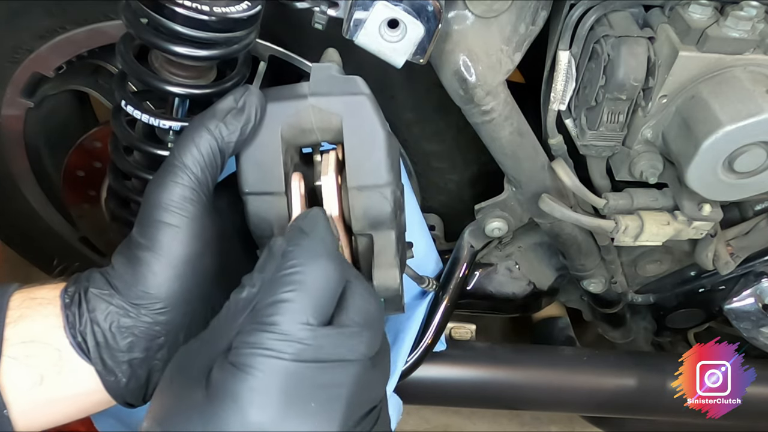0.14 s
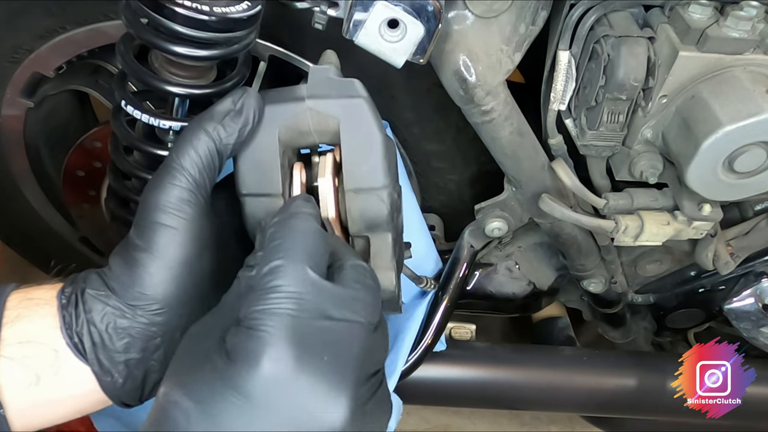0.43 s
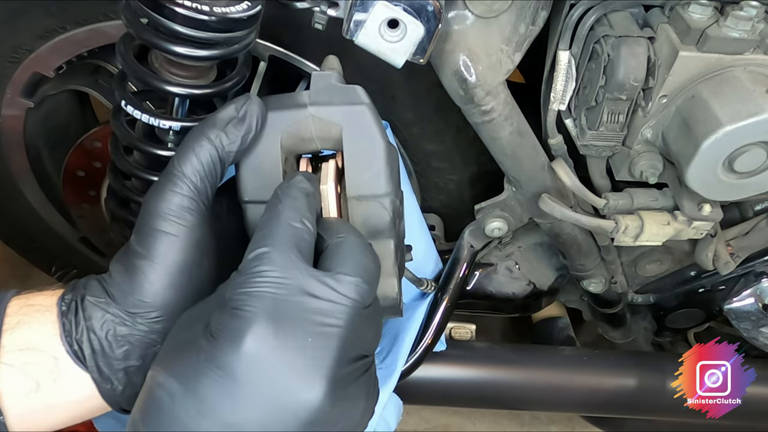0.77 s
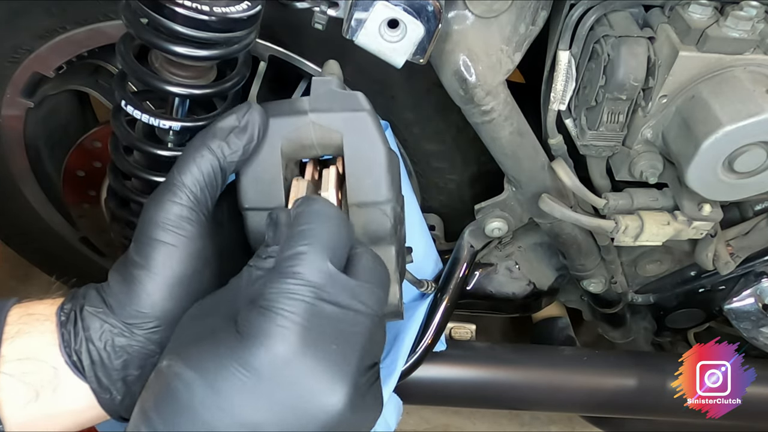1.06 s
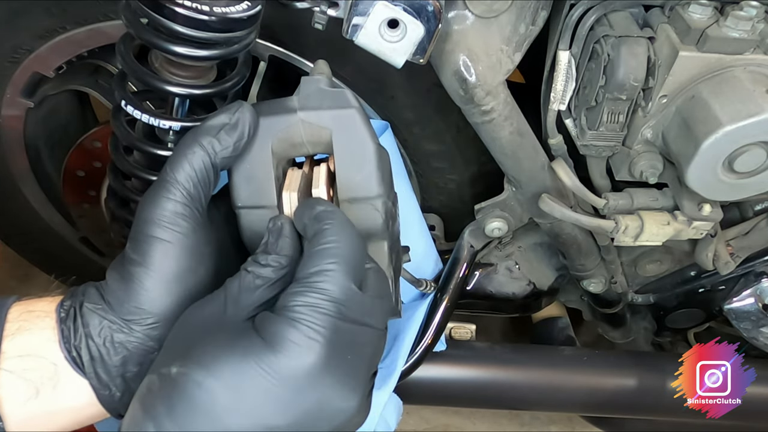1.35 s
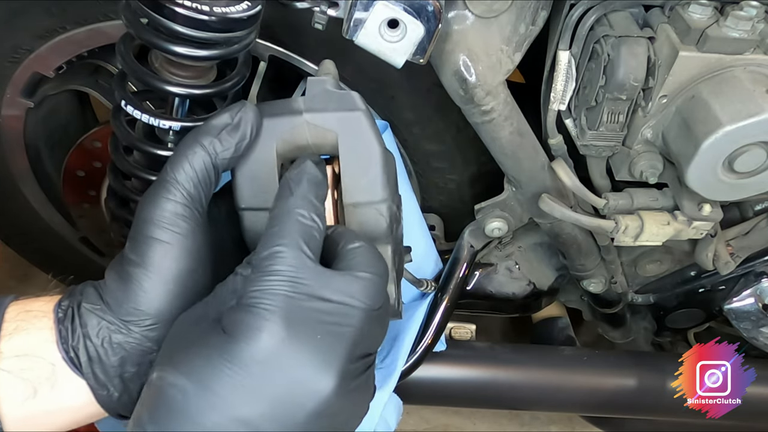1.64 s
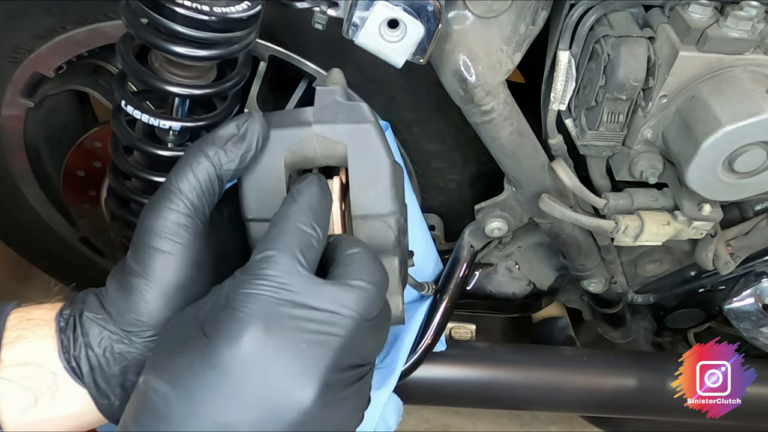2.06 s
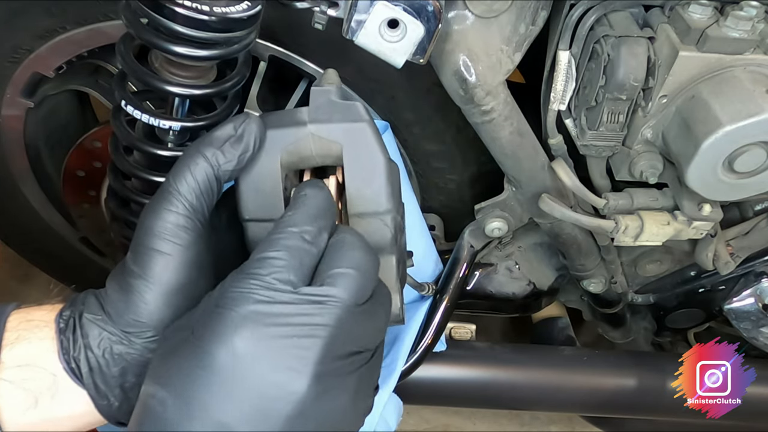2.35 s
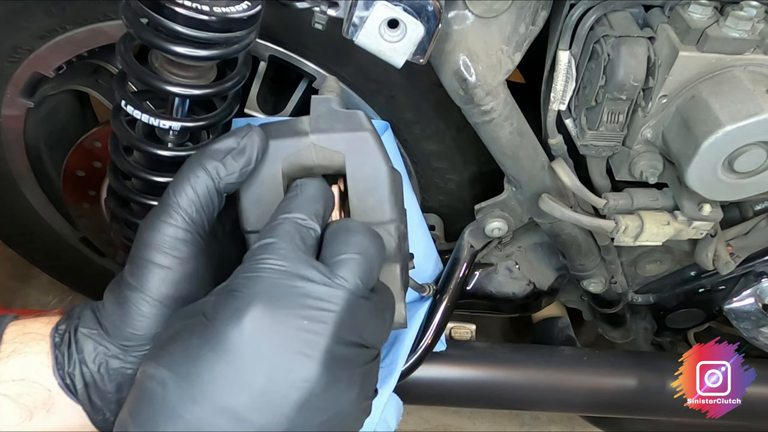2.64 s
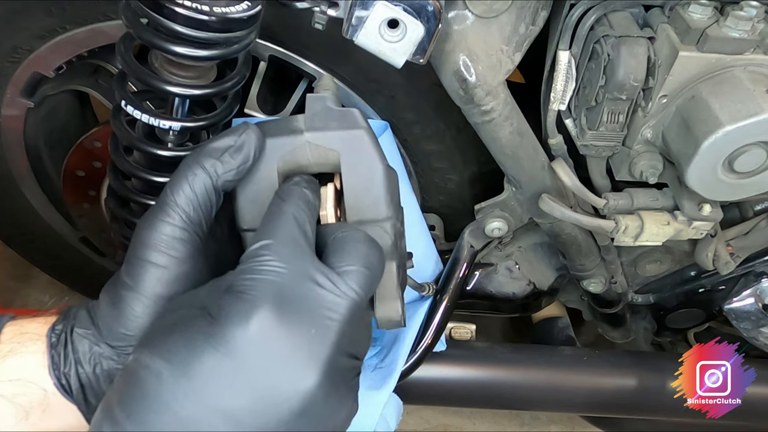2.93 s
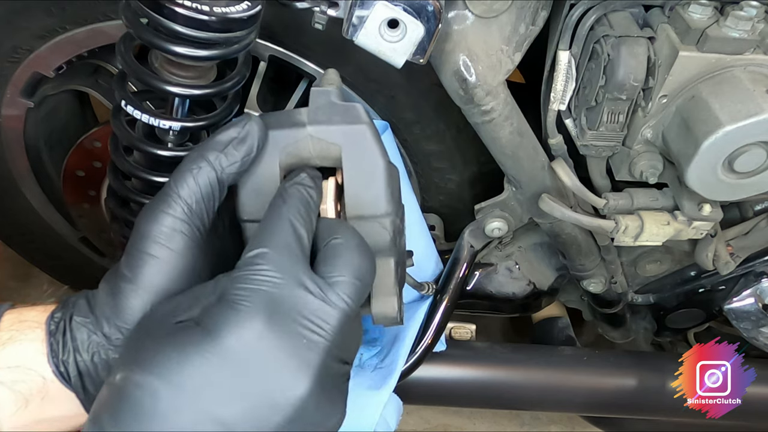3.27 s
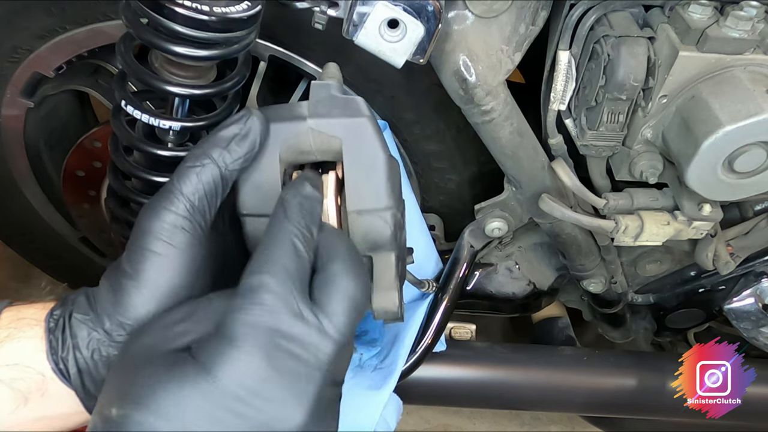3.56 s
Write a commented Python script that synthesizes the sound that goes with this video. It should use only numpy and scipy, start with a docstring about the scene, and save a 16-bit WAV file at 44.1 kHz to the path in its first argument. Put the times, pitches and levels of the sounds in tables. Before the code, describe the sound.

Steel brake pads scrape and click lightly in a caliper, snapping home at about 0.4 seconds with a brief squeal and a ringing spring clip. From 0.7 to 1.7 seconds rubber gloves rub and snap on the metal. Light taps come around 1.3, 2.3 and 2.7 seconds, then dull knocks from 2.9 to 3.2 and a final tap. All is close, in a garage with a faint motor hum.

```python
"""Gloved hands slide steel brake pads into a caliper, close up in a garage, over a low motor hum. A pad scrapes
along its guide in stick-slip, clicks, squeals and snaps home at 0.42 s; its spring clip sings. From 0.7 s
rubber gloves rub and snap on the metal, and a second pad taps lightly. From 2.9 s the caliper knocks dully and
shakes its mount."""
import sys
import numpy as np
from scipy import signal
from scipy.fft import rfft, irfft, next_fast_len
from scipy.io import wavfile
from scipy.ndimage import uniform_filter1d

SR = 44100
rng = np.random.default_rng(int(sys.argv[2]) if len(sys.argv) > 2 else 0)


def unload_audio(sound):
    """Save the sound as a 16-bit wav file, at the path given as the first command line argument."""
    columns = np.transpose(np.atleast_2d(sound))
    # keep every value between -1 and 1, then stretch to whole-number steps
    steps = np.round(np.clip(columns, -1, 1) * 32767)
    wavfile.write(sys.argv[1], SR, steps.astype(np.int16))


N = 163170
T = np.arange(N) / SR
T_RING = T[:SR // 2]

# motor hum (multiple of shaft rate, level [dB])
HUM = [(3, -63.5), (4, -62), (5, -65.5), (6, -72), (8, -75.5), (9, -83)]
# garage air spectrum (frequency [Hz], gain [dB])
AIR_EQ = [(4, -15), (11, 6.5), (20, 4), (40, -8), (100, -8), (160, -22), (260, -26), (370, -27), (600, -34),
          (1500, -40.5), (4000, -45), (8000, -46.5), (14500, -50), (16000, -60)]
# rumble envelope (time [s], level [dB])
RUMBLE_LEVELS = [(0, -56), (.45, -47.5), (.8, -61), (1.35, -40.5), (1.9, -58), (2.6, -44.5), (3.2, -37),
                 (3.7, -45)]
# pad slides (start [s], length [s], start level [dB], end level [dB])
PAD_SLIDES = [(0.006, 0.027, -69, -63.5), (0.141, 0.026, -58.5, -62.5), (0.226, 0.14, -66.5, -63),
              (0.348, 0.088, -62, -52), (0.576, 0.18, -78.5, -73)]
# sliding pad resonances (frequency [Hz], width [Hz], gain [dB])
SLIDE_RESONANCES = [(1300, 200, 2), (2060, 130, -5), (2360, 170, 2.5), (3400, 87, -10), (5450, 870, 1),
                    (7860, 110, 4.5), (12500, 180, -7)]
# loose pad clicks (time [s], level [dB], low-pass [Hz], contact spot pitch [Hz], ring drive [dB])
LOOSE_CLICKS = [(0.1433, -55, 2900, 2100, -18), (.2015, -55.5, 2600, 2090, -8),
                (0.2161, -43.5, 2430, 2420, 0), (.295, -51, 4570, 5300, -8), (.4158, -30.5, 5200, 3400, -5),
                (.4215, -47, 3000, 3550, 7.5)]
# click spectrum (frequency [Hz], gain [dB])
CLICK_EQ = [(150, -9), (500, -7.5), (1000, -3), (1400, -3.5), (1900, 4), (2250, 2), (2900, -1.5),
            (3800, -3), (4700, -9), (5700, -3), (6500, 4.5), (7700, -0.5), (9400, -17), (10800, -9),
            (14200, -7), (15500, -20)]
# loose pad modes (frequency [Hz], gain [dB], t60 [s])
LOOSE_MODES = [(505, -1.5, 0.12), (3560, -18, 0.29), (3470, -5.5, 0.3), (3590, -11, 0.42), (4737, -6, 0.3),
               (5110, 3, 0.13), (7990, 13.5, 0.065), (8670, 6, 0.15), (9330, 0.5, 0.12), (10830, 0, 0.16)]
# spring clip modes (frequency [Hz], gain [dB], t60 [s], starts flat by [Hz])
CLIP_MODES = [(1907, -3, 0.22, 203), (6040, -6, 0.11, 176), (6460, -7.5, 0.075, 46), (9250, -10, 0.11, 47)]
# glove rubs (start [s], length [s], start level [dB], end level [dB], low-pass [Hz])
GLOVE_RUBS = [(0.738, 0.036, -65.5, -70, 680), (0.85, 0.013, -58, -57, 5950),
              (0.866, 0.026, -64, -69, 7000), (1.065, 0.022, -76, -60.5, 9200),
              (1.091, 0.014, -56.5, -55.5, 18000), (1.12, 0.053, -70.5, -63, 8750),
              (1.28, 0.041, -60.5, -59, 11900), (1.375, 0.05, -66.5, -57, 7050),
              (1.466, 0.031, -55, -55, 6500), (1.556, 0.04, -56, -61.5, 8300),
              (1.609, .043, -68, -56.5, 9200), (2.479, .18, -74.5, -72.5, 5000),
              (2.702, 0.061, -69.5, -67, 3000), (2.779, 0.056, -78, -68, 18000),
              (3.642, 0.048, -68.5, -59, 9000)]
# rubber-on-metal spectrum (frequency [Hz], gain [dB])
RUBBER_EQ = [(200, -8.5), (1500, -7.5), (2500, -1.5), (3800, -3.5), (5000, 1), (5600, 5), (6500, 3),
             (7600, 2.5), (9500, -1.5), (11000, 3), (13000, -0.5), (13800, 1), (15500, -13)]
# glove snaps (time [s], level [dB])
GLOVE_SNAPS = [(1.101, -60), (1.176, -69), (1.4103, -40), (1.4155, -43), (1.4171, -49), (1.489, -49.5),
               (1.4995, -55), (1.564, -52), (1.614, -56), (1.653, -47.5), (2.952, -61)]
# second pad taps (time [s], level [dB], low-pass [Hz], contact spot pitch [Hz], ring drive [dB])
SECOND_PAD_TAPS = [(1.3035, -52, 2500, 1700, -1), (1.3126, -41, 4500, 3150, -11.5),
                   (2.284, -52, 1200, 1930, -20), (2.6938, -47.5, 9000, 3430, -19),
                   (3.697, -49.5, 3500, 2630, -16)]
# tap spectrum (frequency [Hz], gain [dB])
TAP_EQ = [(650, -9), (1200, -2.5), (4200, -1), (4900, -7), (7500, -4), (9000, -13.5)]
# second pad modes (frequency [Hz], gain [dB], t60 [s])
SECOND_PAD_MODES = [(2456, -6, 0.17), (3470, -3.5, 0.25), (4177, -2, .22), (4370, -3, .12)]
# mount thumps (time [s], level [dB])
MOUNT_THUMPS = [(1.912, -59.5), (2.868, -47), (3.138, -45.5), (3.169, -46), (3.211, -47), (3.235, -41)]
# mount modes (frequency [Hz], gain [dB], t60 [s])
MOUNT_MODES = [(28.5, 4, 0.36), (48.8, -2, 0.4), (144, -3.5, 0.28), (178, 4, 0.091), (227.4, -2, 0.21),
               (290, -6, 0.27), (331.7, -3.5, 0.16)]
# caliper knocks (time [s], drive [dB], low-pass [Hz])
CALIPER_KNOCKS = [(2.863, -48.5, 800), (2.871, -56, 600), (3.1375, -41, 5070), (3.151, -47.5, 2030),
                  (3.168, -51.5, 1600), (3.2075, -44.5, 1570), (3.217, -48.5, 1600)]
# knock spectrum (frequency [Hz], gain [dB])
KNOCK_EQ = [(200, 4.5), (380, -2), (700, -16.5), (1200, -3), (1500, -9), (2200, 6), (2600, -3), (3000, 3.5),
            (3500, -10.5), (5700, -8.5), (8000, -24.5), (15000, -16)]
# caliper modes (frequency [Hz], gain [dB], t60 [s])
CALIPER_MODES = [(1206, -7.5, 0.25), (1716, -4, 0.22), (1830, -11, 0.37), (2207, -1, 0.12), (2350, -1, .19),
                 (3004, 2, 0.071), (3440, -13, 0.17)]


def amp(db):
    """Decibels to gain."""
    return 10 ** (np.asarray(db) / 20)


def unit(x):
    """Scale to rms 1."""
    return x / np.sqrt(np.mean(x ** 2))


def unit_blow(x):
    """Scale to the energy of 3 ms at rms 1."""
    return x / np.sqrt(np.sum(x ** 2) / (0.003 * SR))


def add(out, at_s, x):
    """Mix x into out at a time."""
    i = int(at_s * SR)
    out[i:i + len(x)] += x[:N - i]


def colour(x, eq):
    """Minimum-phase filter through (frequency [Hz], gain [dB]) points."""
    hz, db = np.array(eq, float).T
    n = next_fast_len(2 * len(x), True) // 2 * 2
    bins_hz = np.arange(n // 2 + 1) * SR / n
    gain = amp(np.interp(np.log(bins_hz + 1), np.log(hz), db))
    cepstrum = irfft(np.log(gain))
    cepstrum[1:n // 2] *= 2
    cepstrum[n // 2 + 1:] = 0
    return irfft(rfft(x, n) * np.exp(rfft(cepstrum)))[:len(x)]


def soften(x, hz):
    """First-order low-pass."""
    return signal.lfilter(*signal.butter(1, min(hz, SR / 2 - 1000), fs=SR), x)


def resonate(x, hz, width_hz, stages=1):
    """Identical resonators in series; rms 1."""
    for _ in range(stages):
        x = unit(signal.lfilter(*signal.iirpeak(hz, hz / width_hz, fs=SR), x))
    return x


def ring(modes):
    """Decaying modes, slightly detuned per strike; starts at rms 1."""
    tones = 0
    for hz, db, t60_s in modes:
        phase = 2 * np.pi * hz * (1 + 0.0016 * rng.standard_normal()) * T_RING
        tones += amp(db - 60 * T_RING / t60_s) * np.sin(phase) * rng.choice([-1, 1])
    return tones / np.sqrt(sum(amp(db) ** 2 for _, db, _ in modes) / 2)


def wash(hz, width_hz, t60_s):
    """Dense modes as a decaying noise band; starts at rms 1."""
    band = resonate(rng.standard_normal(len(T_RING)), hz, width_hz, stages=2)
    return band * amp(-60 * T_RING / t60_s)


def contact(decay_s, rattle):
    """Impulse plus a brief dying rattle."""
    force = rattle * rng.standard_normal(len(T_RING)) * np.exp(-T_RING / decay_s)
    force[0] += 2
    return force


def slips(rate_hz, spread):
    """Random stick-slip pulses of log-normal size."""
    onsets = rng.random(N) < rate_hz / SR
    return onsets * np.exp(spread * rng.standard_normal(N)) * rng.choice([-1, 1], N)


def wander(rate_hz):
    """Smooth random drift; standard deviation near 1."""
    hold = int(SR / rate_hz)
    steps = np.repeat(rng.standard_normal(N // hold + 1), hold)
    return 1.296 * uniform_filter1d(uniform_filter1d(steps, hold), hold)[:N]


def stroke(start_s, length_s, from_db, to_db, release_s):
    """Stroke envelope: quick attack, pressure ramp, release."""
    t = T - start_s
    pressure = amp(np.interp(t, [0, length_s], [from_db, to_db]))
    return pressure * np.clip(t / 0.0075, 0, 1) * np.exp(-np.maximum(t - length_s, 0) / release_s)


def motor_hum(shaft_hz=24.29, waver_db=3.16):
    """Shaft harmonics, wavering in pitch and level."""
    angle = 2 * np.pi * np.cumsum(shaft_hz * (1 + 0.00821 * wander(1.964))) / SR
    out = np.zeros(N)
    for order, db in HUM:
        rms = amp(db + waver_db * wander(3.91))
        out += rms * np.sqrt(2) * np.sin(order * angle + 2 * np.pi * rng.random())
    return out


def garage_air(air_db=-51):
    """Steady bass-heavy noise plus a deep, swelling rumble."""
    air = colour(rng.standard_normal(N), AIR_EQ)
    air /= np.linalg.norm(colour(signal.unit_impulse(N), AIR_EQ))
    rumble = resonate(rng.standard_normal(N), hz=13, width_hz=4.5, stages=2)
    rumble_db = np.interp(T, *np.array(RUMBLE_LEVELS).T)
    return amp(air_db) * air + amp(rumble_db) * rumble


def pad_slides(squeal_db=-52.5, squeal_from_s=0.336, squeal_to_s=0.4, rise_s=0.024, fall_s=0.01):
    """Steel grinds along the guide; one resonance squeals just before the pad seats."""
    force = sum(stroke(*slide, release_s=0.007) for slide in PAD_SLIDES)
    grit = slips(rate_hz=990, spread=0.3) * amp(2.8 * wander(90.1))
    scrape = unit(sum(amp(db) * resonate(grit, hz, width_hz) for hz, width_hz, db in SLIDE_RESONANCES))
    squeal = resonate(grit, hz=6530, width_hz=160, stages=2)
    swell = np.clip((T - squeal_from_s) / rise_s, 0, 1)
    release = np.exp(-np.maximum(T - squeal_to_s, 0) / fall_s)
    return force * scrape + amp(squeal_db) * swell * release * squeal


def pad_hits(hits, eq, modes):
    """Steel backing hits the caliper: a crack, then pad modes in a metallic wash."""
    out = np.zeros(N)
    for at_s, db, cutoff_hz, spot_hz, ring_drive_db in hits:
        force = contact(decay_s=0.0045, rattle=0.21)
        crack = unit_blow(soften(colour(force, eq), cutoff_hz))
        spot = unit_blow(resonate(crack, spot_hz, width_hz=2350, stages=2))
        crack = unit_blow(crack + 0.57 * spot)
        tail = ring(modes) + amp(-13.5) * wash(hz=3525, width_hz=230, t60_s=0.43)
        tail = soften(soften(tail, 2 * cutoff_hz), 2 * cutoff_hz) / 2
        add(out, at_s, amp(db) * (crack + amp(ring_drive_db) * tail))
    return out


def spring_clip(at_s=0.4505, gain_db=-41.5, waver_hz=25):
    attack_s, settle_s, hold_s, stop_s = 0.00096, 0.0168, 0.066, 0.006
    out, t = np.zeros(N), T_RING
    gate = (1 - np.exp(-t / attack_s)) * np.exp(-np.maximum(t - hold_s, 0) / stop_s)
    for hz, db, t60_s, flat_hz in CLIP_MODES:
        pitch_hz = hz - flat_hz * np.exp(-t / settle_s) + waver_hz * wander(550)[:len(t)]
        tone = amp(-60 * t / t60_s) * np.sin(2 * np.pi * np.cumsum(pitch_hz) / SR)
        scuff = amp(-2.5) * wash(hz, width_hz=800, t60_s=0.057)
        add(out, at_s, amp(gain_db + db) * gate * (tone + scuff))
    return out


def gloves(snap_decay_s=0.0022, snap_rattle=0.31, creak_db=-84.5):
    """Rubber drags over metal, snaps free and creaks faintly throughout."""
    out = np.zeros(N)
    drag = colour(slips(rate_hz=2200, spread=0.38), RUBBER_EQ) * amp(2 * wander(200))
    for *rub, cutoff_hz in GLOVE_RUBS:
        out += stroke(*rub, release_s=0.0074) * unit(soften(drag, cutoff_hz))
    for at_s, db in GLOVE_SNAPS:
        snap = unit_blow(colour(contact(snap_decay_s, snap_rattle), RUBBER_EQ))
        ping = unit_blow(resonate(snap, hz=5400, width_hz=750))
        add(out, at_s, amp(db) * unit_blow(snap + 0.76 * ping))
    creaks = signal.fftconvolve(slips(rate_hz=95, spread=0.33), contact(snap_decay_s, snap_rattle))[:N]
    return out + amp(creak_db) * unit(colour(creaks, RUBBER_EQ))


def mount_thumps():
    """The shaken mount rings in its low modes."""
    out = np.zeros(N)
    for at_s, db in MOUNT_THUMPS:
        add(out, at_s, amp(db) * ring(MOUNT_MODES))
    return out


def caliper_knocks():
    """The whole caliper knocks on its mount: a dull, rattling blow, then ringing modes."""
    out = np.zeros(N)
    for at_s, drive_db, cutoff_hz in CALIPER_KNOCKS:
        force = contact(decay_s=0.01, rattle=0.59)
        knock = 1.23 * unit_blow(soften(colour(force, KNOCK_EQ), cutoff_hz))
        tail = amp(-10) * ring(CALIPER_MODES) + amp(-15.5) * wash(hz=1980, width_hz=1000, t60_s=0.31)
        add(out, at_s, amp(drive_db) * (knock + tail))
    return out


def garage_reverb(x, t60_s=0.52, wet_db=-15.5, cutoff_hz=4160, attack_s=0.00093):
    """Diffuse, dull reflections; a new noise tail per call."""
    noise = soften(soften(rng.standard_normal(len(T_RING)), cutoff_hz), cutoff_hz)
    tail = noise * amp(-60 * T_RING / t60_s) * np.clip(T_RING / attack_s, 0, 1)
    return amp(wet_db) * signal.fftconvolve(x, tail / np.linalg.norm(tail))[:N]


def scene():
    """Stereo mix: sources centred, slight width from reverb and hiss."""
    pads = pad_hits(LOOSE_CLICKS, CLICK_EQ, LOOSE_MODES) + pad_hits(SECOND_PAD_TAPS, TAP_EQ, SECOND_PAD_MODES)
    metal = pads + caliper_knocks() + mount_thumps() + pad_slides()
    clip, rubber = spring_clip(), gloves()
    send = metal + amp(-5) * clip + amp(0.5) * rubber
    side_reverb = 0.05 * garage_reverb(send)
    hiss = rng.standard_normal(N) + unit(soften(rng.standard_normal(N), hz=720))
    side = side_reverb + amp(-83) * hiss
    mid = metal + clip + rubber + garage_reverb(send) + motor_hum() + garage_air()
    return np.array([mid + side, mid - side])


def record(dry):
    """Steep low-pass at 15.7 kHz."""
    return signal.sosfilt(signal.ellip(8, 0.2, 70, 15700, fs=SR, output="sos"), dry)


dry = scene()
out = record(dry)
unload_audio(out)
```